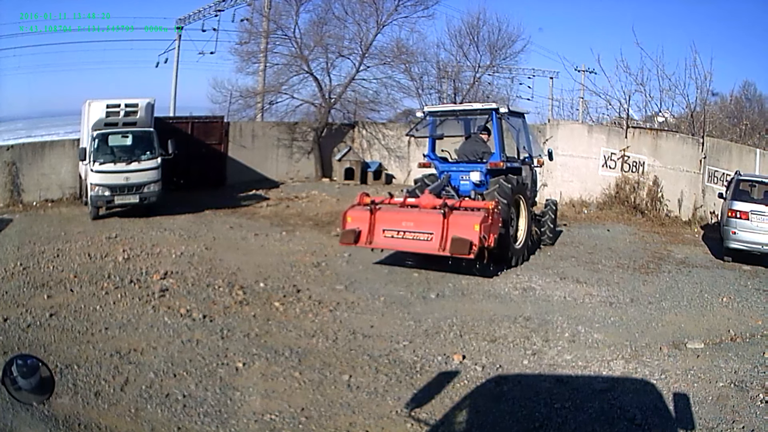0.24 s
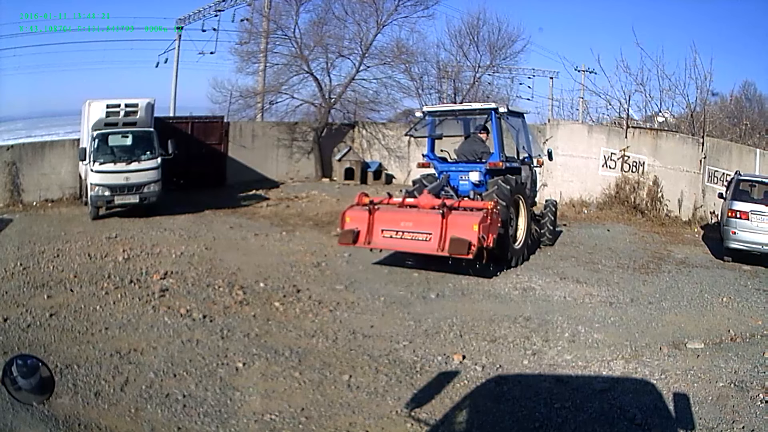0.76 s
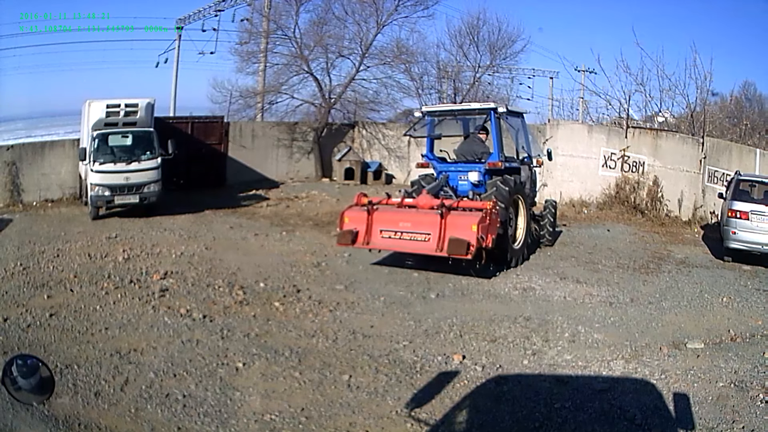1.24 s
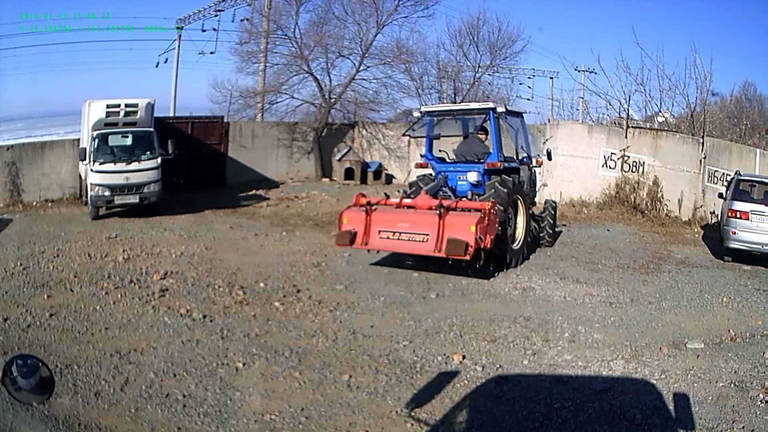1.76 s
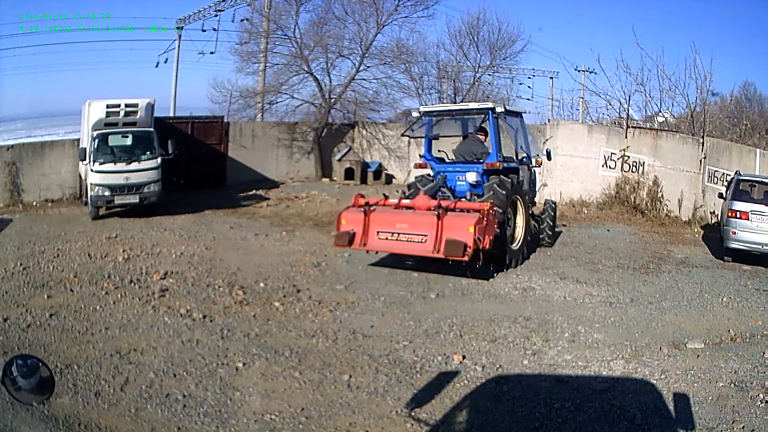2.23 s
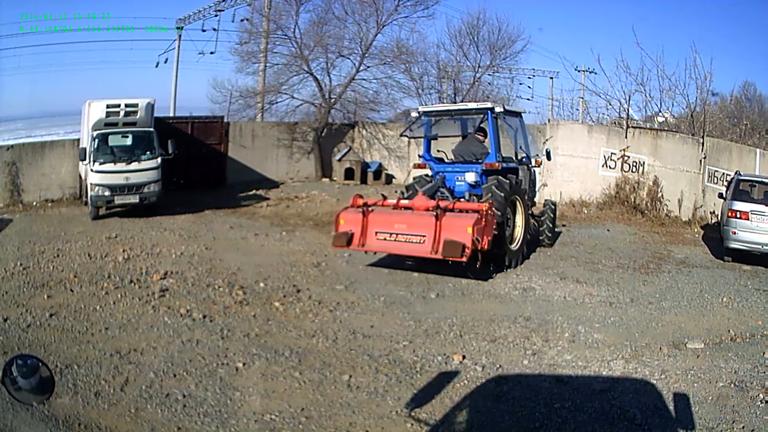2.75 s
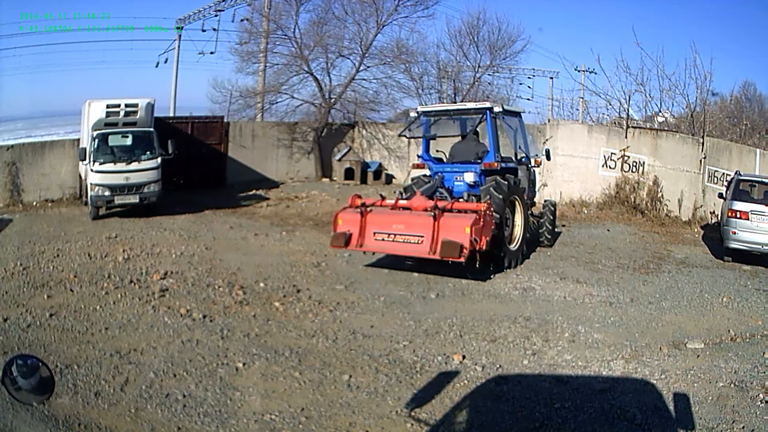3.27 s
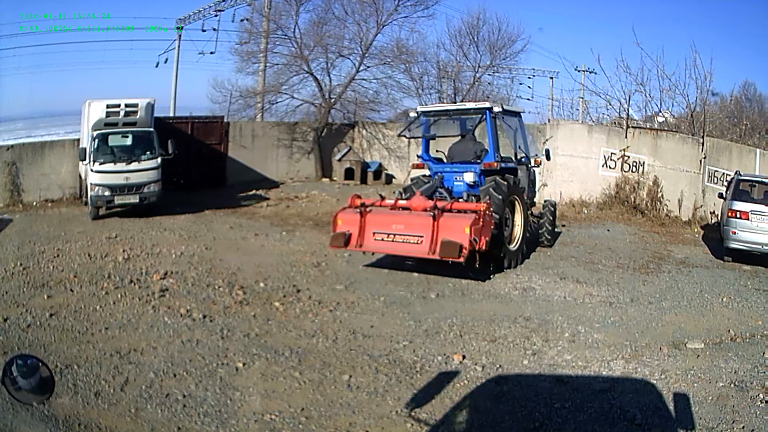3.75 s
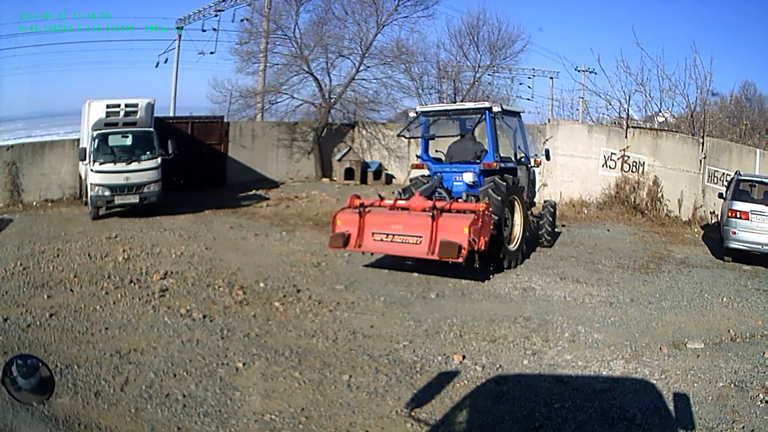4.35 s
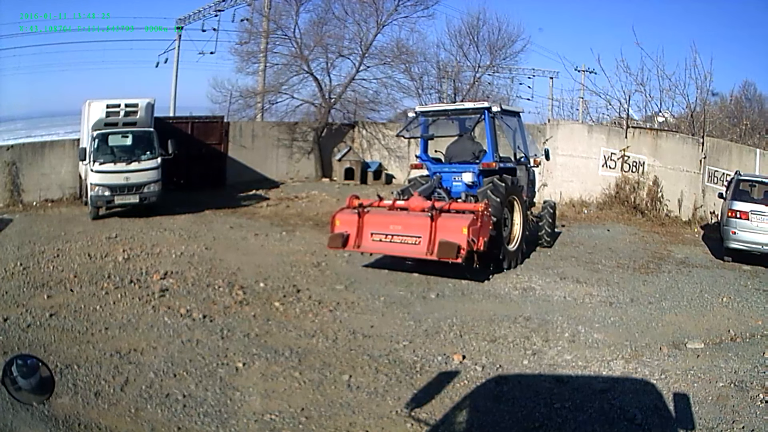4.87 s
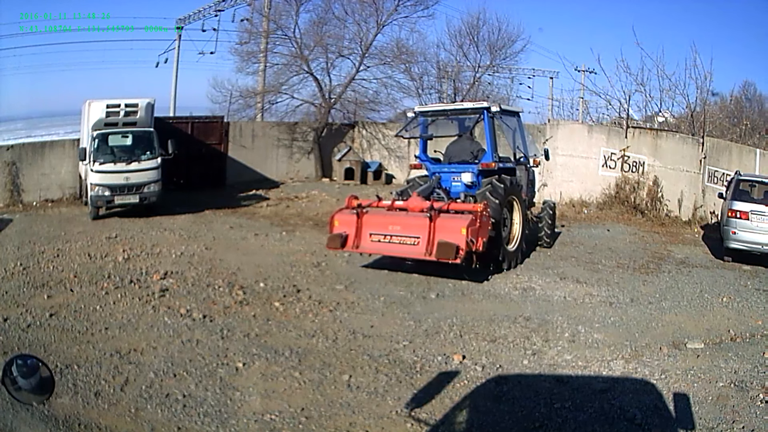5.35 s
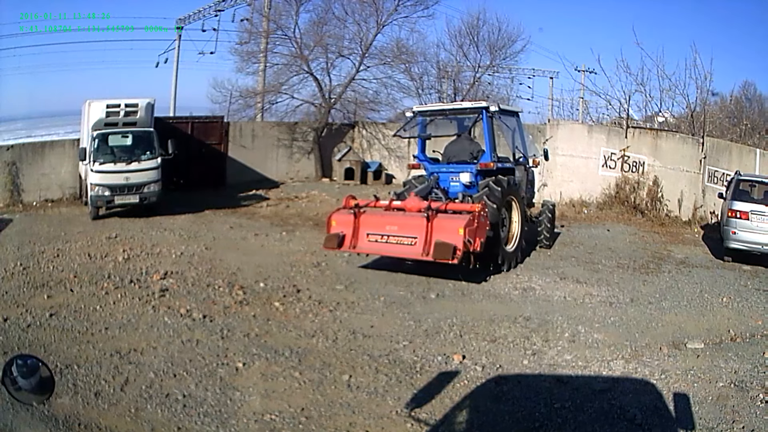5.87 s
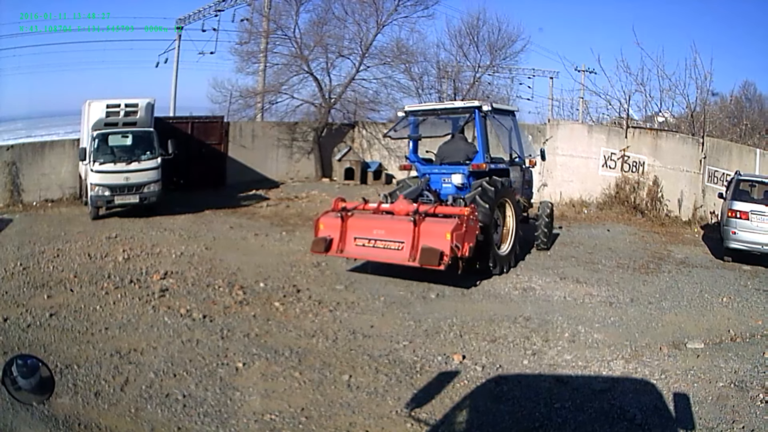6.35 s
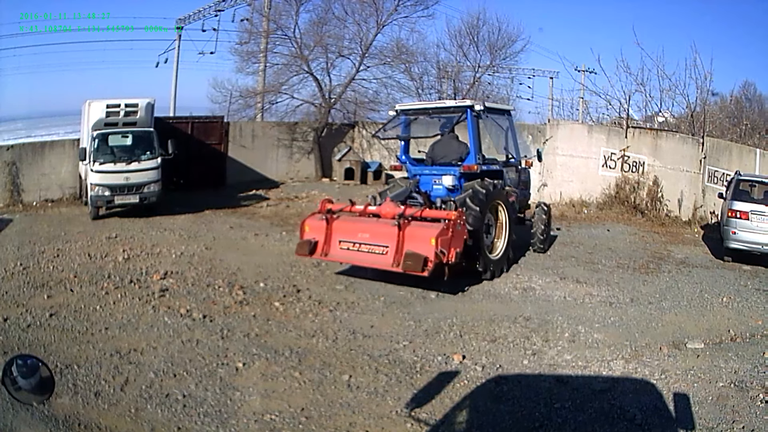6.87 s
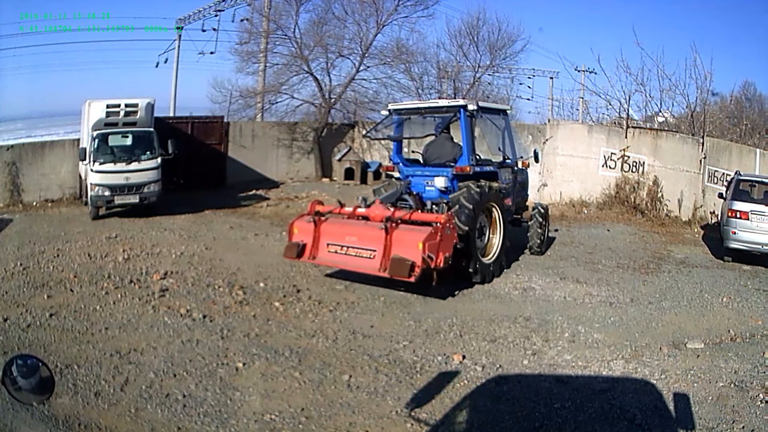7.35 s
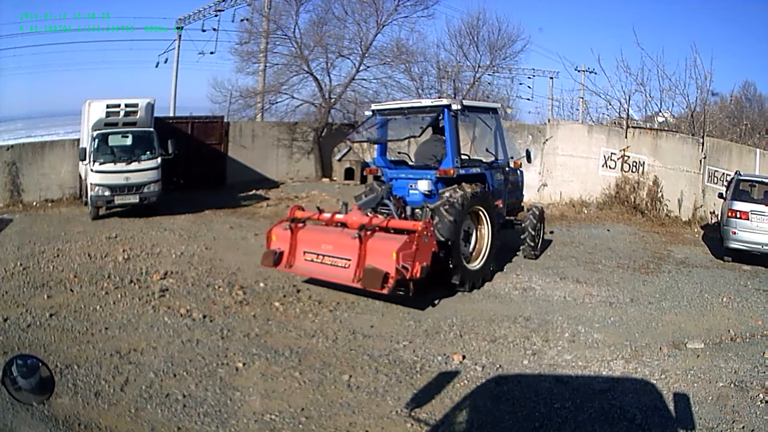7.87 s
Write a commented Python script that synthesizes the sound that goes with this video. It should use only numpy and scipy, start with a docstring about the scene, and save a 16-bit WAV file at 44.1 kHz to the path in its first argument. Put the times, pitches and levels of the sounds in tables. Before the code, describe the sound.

From 0 s a four-cylinder diesel tractor idles about 8 m away in an open yard, around 28 firings a second: low loping chug, hollow body drone, soft clatter and faint humming panels. The small camera's microphone adds bright hiss, fizz flickering 25 times a second and a thin 7 kHz buzz, on until 0.8, then mostly 1.4-2.9, 3.7-5.3 and 5.4-7.4 s. Overall level repeatedly halves in sudden steps. Faint tiller clanks come at 1.2 and 1.6 s. Idle rises slightly near 4 s. At 5.35 s the clutch bites: a hard chuff, firing drops to about 21 a second, clatter hardens, linkage chatters and steel knocks. Level jumps up at 6.0 s. A sharp clank at 6.35 s starts the reverse; revs recover and the engine nears, growing louder. More clanks follow; level falls at 7.4 and 7.8 s, with the strongest bang at 7.85 s.

```python
"""A four-cylinder diesel tractor idles in a yard, 8 m from a small camera and its microphone.
From the start firing pulses drive its exhaust, drone, clatter and panels; the camera adds hiss, flickering fizz
and an on-off buzz, and the overall level jumps in steps. From 1.2 s shaped sines and noise clank the tiller.
At 5.35 s the clutch bites: the engine lugs and chuffs, and noise bursts chatter the linkage.
From 6.4 s the tractor backs toward the microphone and its engine grows louder."""
import sys
import numpy as np
from scipy import signal
from scipy.fft import rfft, irfft, next_fast_len
from scipy.io import wavfile
from scipy.ndimage import uniform_filter1d, map_coordinates

SR = 44100
rng = np.random.default_rng(int(sys.argv[2]) if len(sys.argv) > 2 else 0)


def transcribe(signal):
    """Save signal, clipped to [-1, 1], as a 16-bit WAV file at the path in sys.argv[1]."""
    frames = np.atleast_2d(signal).T
    limited = np.clip(frames, -1, 1)
    pcm = np.round(limited * 32767).astype(np.int16)
    wavfile.write(sys.argv[1], SR, pcm)


N = 357651

# engine speed at idle, dragged down by the clutch, recovering: time_s [s], firing_rate [firings/s]
ENGINE_SPEED = [(0, 27.9), (3.9, 28.25), (4.2, 28.75), (5.33, 28.7), (5.5, 22), (5.9, 21.2), (6.42, 22.4),
                (6.7, 26.2), (7.2, 27.1), (8.11, 27.4)]
# exhaust orders: multiple [of firing rate], idle_level_db [dB], load_level_db [dB]
EXHAUST_ORDERS = [(1, -4.5, -1.5), (2, -2.5, -5), (3, -17, -22), (4, -25, -25), (5, -30, -32),
                  (6, -25, -28)]
# strength of each cylinder in firing order: level_db [dB]
CYLINDER_DB = [0.9, 2.5, 0.5, 1]
# low rumble spectrum: freq_hz [Hz], level_db [dB per Hz]
RUMBLE_SPECTRUM = [(10, -3), (35, 0), (60, -4), (100, -15), (200, -24)]
# body drone spectrum: freq_hz [Hz], level_db [dB per Hz]
DRONE_SPECTRUM = [(70, -34), (110, -11), (150, -3.5), (200, 6.5), (310, -3), (400, 1.5), (480, -8.5),
                  (700, -6)]
# diesel clatter spectrum at idle: freq_hz [Hz], level_db [dB per Hz]
IDLE_SPECTRUM = [(300, -12), (430, -2), (530, 3), (680, -4), (900, -3), (1150, -2.5), (1350, 0),
                 (1580, 2.5), (1720, -3), (1880, -10.5), (2300, -12), (2900, -43), (5000, -9)]
# diesel clatter spectrum under load: freq_hz [Hz], level_db [dB per Hz]
LOAD_SPECTRUM = [(300, -13), (470, -9.5), (720, 2), (930, -2), (1080, 6), (1200, -2.5), (1330, 9.5),
                 (1480, 1), (1600, 7.5), (1840, -9), (1980, -2.5), (2100, -8.5), (2400, -9.5),
                 (2900, -23.5)]
# injector tick spectrum: freq_hz [Hz], level_db [dB per Hz]
INJECTOR_SPECTRUM = [(1500, -9), (2400, 3.5), (3000, 4.5), (3800, 10), (4800, 8.5), (6500, 3.5),
                     (8000, 2.5), (11000, -6)]
# thin panel resonances: pitch_hz [Hz], width_hz [Hz], idle_level_db [dB], load_level_db [dB]
PANEL_MODES = [(253, 10, -3, -14), (278, 16, -3, -2), (310, 24, 3, -4), (517, 12, -2, -12),
               (543, 10, -12, -1), (590, 18, -1, -10), (680, 12, -14, -3), (743, 10, -14, -5),
               (995, 24, -6, -6), (1110, 20, -11, -3), (1335, 14, -10, -2), (1437, 14, -8, -8),
               (1570, 45, -6, -3), (1757, 9, -18, 1), (1980, 16, -24, -9), (2400, 16, -28, -6)]
# engine orders that hum for a while: start_s [s], end_s [s], multiple [of firing rate], level_db [dB]
ORDER_HUMS = [(-.6, 1.1, 9, -51), (-.6, 5.5, 11, -52), (1.4, 3.3, 21, -50), (1.2, 3.1, 35, -50.5),
              (3.9, 5.5, 10, -53), (3.9, 5.5, 14, -54), (3.9, 5.5, 20, -51), (4, 5.5, 50, -49.5),
              (6.8, 8.4, 10, -51)]
# camera hiss spectrum: freq_hz [Hz], level_db [dB per Hz]
HISS_SPECTRUM = [(1800, -15), (2600, -5.5), (3500, -2.5), (5200, -5), (6000, 8.5), (6700, 6.5), (7400, 7),
                 (7950, -9.5), (8600, 11), (9800, -1.5), (10500, -1), (11400, -12.5)]
# camera fizz spectrum: freq_hz [Hz], level_db [dB per Hz]
FIZZ_SPECTRUM = [(7900, -41), (8400, -38), (8600, -6.5), (8850, 1.5), (9050, -4.5), (9350, -18.5),
                 (10000, -19), (11000, -31)]
# spectrum of the noise within the buzz: freq_hz [Hz], level_db [dB per Hz]
BUZZ_NOISE_SPECTRUM = [(2200, -17), (3200, -13), (3520, -0.5), (3900, -9), (5200, -10.5), (5850, 1.5),
                       (6200, -12.5), (6650, 8), (7300, -7.5), (7900, -49), (10100, -24), (10550, -4.5),
                       (11400, -28)]
# ringing of the electrical buzz: pitch_hz [Hz], width_hz [Hz], level_db [dB]
BUZZ_RING_MODES = [(6555, 60, -8), (6780, 55, -3), (7025, 85, 0)]
# when the buzz is on: start_s [s], end_s [s]
BUZZ_TIMES = [(-.1, .79), (1.36, 2.95), (3.68, 5.27), (5.39, 5.76), (5.81, 7.405)]
# ringing of the tiller's steel: pitch_hz [Hz], level_db [dB], t60_s [s]
STEEL_MODES = [(194, -2, 0.22), (242, -16, 0.052), (334, 7.5, 0.65), (395, 11, 0.15), (474, 17.5, 0.16),
               (567, -16, 0.15), (625, 16, 0.097), (742, 5, 0.27), (850, -23, 0.11), (870, -42, 0.023),
               (1069, 14, 0.17), (1056, -14, 0.09), (1232, 18, 0.18), (1390, 17, 0.05), (1630, -9, .06)]
# tiller clanks: start_s [s], level_db [dB], centre_hz [Hz], spread_oct [octaves], contact_noise_s [s]
TILLER_CLANKS = [(1.217, -28.5, 1560, .08, .06), (1.565, -33, 470, .3, .12), (5.445, -22, 1000, .8, .1),
                 (5.585, -26, 750, .8, .12), (5.705, -20, 800, .8, .14), (6.099, -23, 700, 1.4, .05),
                 (6.348, -13.5, 1200, .4, .036), (6.35, -19, 240, .6, .06), (6.384, -27, 400, 1, .07),
                 (6.487, -26.5, 700, .3, .08), (6.817, -17.5, 700, .22, .05), (7.175, -26.5, 600, .7, .08),
                 (7.555, -27, 520, .5, .08), (7.846, -7.7, 720, .42, .034)]
# linkage chatter spectrum: freq_hz [Hz], level_db [dB per Hz]
LINKAGE_SPECTRUM = [(250, -12), (400, -7), (480, 9.5), (580, -3.5), (740, -1.5), (880, -3), (1040, 4.5),
                    (1200, -5), (1600, -16.5), (2500, -22)]
# the overall level drops to half: start_s [s], end_s [s]
LEVEL_DIPS = [(.38, .565), (.945, 1.212), (1.402, 1.77), (2.335, 2.42), (2.8, 2.98), (3.27, 3.63),
              (3.82, 4.185), (4.745, 4.79), (5.215, 5.993), (7.81, 8.2)]
# the overall level doubles: start_s [s], end_s [s]
LEVEL_BOOSTS = [(5.993, 7.445)]

# the clutch hands over a share of the load as it bites (s), the rest during the pull (s)
CLUTCH_S, BITE_S, BITE_SHARE, PULL_S = 5.35, 0.045, 0.55, 1.8
# the tractor starts to roll, its first distance from the microphone, its speed
ROLL_S, DISTANCE_M, ROLL_M_PER_S = 6.4, 8, 1.1
# engine layers before the approach: idle level (dB), rise at full load (dB), rise per firing/s lost (dB)
EXHAUST_DB, EXHAUST_LOAD_DB, EXHAUST_LUG_DB = -35.3, 5.6, 0.3
RUMBLE_DB, RUMBLE_LOAD_DB, RUMBLE_LUG_DB = -47.2, 4, 0.35
DRONE_DB, DRONE_LOAD_DB, DRONE_LUG_DB = -45, -2, 0.8
CLATTER_DB, CLATTER_LOAD_DB = -42, 6
# each chug leaves the pipe this share of a firing period after its knock
EXHAUST_LAG = 0.363
# one hard chuff as the clutch bites: peak rise, time from bite to peak
CHUFF_DB, CHUFF_S = 5, 0.039
# a longer contact starts more softly: attack time over contact length
ATTACK_SHARE = 0.022
LINKAGE_DB, LINKAGE_SETTLE_DB_PER_S = -35.5, 5
# size of a level step, upper limit of the sound, resting value of the converter (full scale = 1)
STEP_DB, TOP_HZ, OFFSET = 6, 11550, -0.028


def amp(db):
    """Decibels to gain."""
    return 10 ** (np.asarray(db) / 20)


def unit(x):
    """Scale to rms 1."""
    return x / np.sqrt(np.mean(x ** 2) + 1e-20)


def clock():
    """The time of each sample in seconds."""
    return np.arange(N) / SR


def wobble(rate):
    """A smooth random curve with rate knots a second."""
    return map_coordinates(rng.standard_normal(int(N * rate / SR) + 4), [clock() * rate])


def ramp(start, length):
    """Rises evenly from 0 to 1, start and length in seconds."""
    return np.clip((clock() - start) / length, 0, 1)


def during(spans, size):
    """1 inside the (start_s, end_s) spans and 0 outside, with edges of size samples."""
    inside = sum(1.0 * ((clock() > start) & (clock() < end)) for start, end in spans)
    return uniform_filter1d(inside, size=size)


def filtered(x, response):
    """x times a response of frequency."""
    m = next_fast_len(N + SR // 2)
    return irfft(rfft(x, m) * response(np.fft.rfftfreq(m, 1 / SR)), m)[..., :N]


def coloured(x, spectrum):
    """x shaped by (freq_hz, level_db) points with closed ends, at rms 1."""
    freq, db = np.transpose(spectrum)

    def response(hz):
        return amp(np.interp(np.log(hz + 1), np.log(freq), db, left=-120, right=-120))

    return unit(filtered(x, response))


def resonant(x, modes):
    """x through (pitch_hz, width_hz, level_db) resonances with steepened skirts, at rms 1."""
    def response(f):
        total = 0
        for centre, width, db in modes:
            peak = 1j * f * width / (centre ** 2 - f ** 2 + 1j * f * width)
            skirt = 1 + ((f - centre) / (6 * width)) ** 2
            total = total + amp(db) * peak / skirt
        return total

    return unit(filtered(x, response))


def bursts(cycles, decay, base):
    """Noise that flares once a cycle and dies to a base level; decay in cycles."""
    return rng.standard_normal(N) * (base + np.exp(-(cycles % 1) / decay))


def knocking(firings, decay, base, repeat, scatter_db):
    """Each cylinder knocks with a ring of its own; repeat is its power share against unrepeated rattle."""
    number = firings.astype(int)
    starts = np.flatnonzero(np.diff(number)) + 1
    cylinder = np.arange(number[-1] + 1) % len(CYLINDER_DB)
    scatter = scatter_db * rng.standard_normal(len(cylinder))
    strength = amp(np.array(CYLINDER_DB)[cylinder] + scatter)
    age = np.arange(SR // 10) * firings[-1] / N  # in firings
    rings = np.zeros(N)
    for c in range(len(CYLINDER_DB)):
        own = starts[cylinder[number[starts]] == c]
        blows = np.bincount(own, strength[number[own]], N)
        ring = rng.standard_normal(len(age)) * np.exp(-age / decay)
        rings += signal.fftconvolve(blows, ring)[:N]
    rattle = strength[number] * bursts(firings, decay, base)
    return np.sqrt(repeat) * unit(rings) + np.sqrt(1 - repeat) * unit(rattle)


def engine_load():
    """Load 0-1: a jump as the clutch bites, then a steady climb."""
    jump = BITE_SHARE * ramp(CLUTCH_S, BITE_S)
    return jump + (1 - BITE_SHARE) * ramp(CLUTCH_S + BITE_S, PULL_S)


def exhaust(firings, load, lug):
    """The lowest orders of the firing rate; uneven cylinders make them lope once an engine cycle."""
    orders = np.zeros(N)
    for k, idle_db, load_db in EXHAUST_ORDERS:
        lag = (k - 1) * (k - 2)  # radians: the pipe delays the higher orders and rounds each chug
        level = idle_db + load * (load_db - idle_db) + 0.5 * wobble(7.9)
        orders += amp(level) * np.cos(2 * np.pi * k * firings - lag)
    lope = 1 + 0.1 * np.cos(2 * np.pi * firings / len(CYLINDER_DB)) + 0.08 * wobble(14)
    chuff = np.exp(-((clock() - CLUTCH_S) / CHUFF_S - 1) ** 2)
    level_db = EXHAUST_DB + EXHAUST_LOAD_DB * load + EXHAUST_LUG_DB * lug + CHUFF_DB * chuff
    return np.sqrt(2) * amp(level_db) * orders * lope


def rumble(load, lug):
    """Steady low noise that grows with load and as the engine slows."""
    level_db = RUMBLE_DB + RUMBLE_LOAD_DB * load + RUMBLE_LUG_DB * lug
    return amp(level_db) * coloured(rng.standard_normal(N), RUMBLE_SPECTRUM)


def drone(firings, load, lug):
    """The body drones as slowly dying knocks overlap."""
    knocks = knocking(firings, decay=1.3, base=1.8, repeat=0.56, scatter_db=0.66)
    level_db = DRONE_DB + DRONE_LOAD_DB * load + DRONE_LUG_DB * lug
    return amp(level_db) * coloured(knocks, DRONE_SPECTRUM)


def clatter(firings, load):
    """Combustion knocks shift to a harder, brighter clatter under load, with injector ticks on top."""
    soft = knocking(firings, decay=1.53, base=1.4, repeat=0.65, scatter_db=0.37)
    hard = knocking(firings, decay=0.75, base=0.95, repeat=0.65, scatter_db=0.4)
    # valves and pistons strike again halfway between the firings
    hard += 0.6 * unit(bursts(2 * firings, decay=1.0, base=0.24))
    idle = np.sqrt(1 - load) * coloured(soft, IDLE_SPECTRUM)
    loaded = np.sqrt(load) * coloured(hard, LOAD_SPECTRUM)
    injection = knocking(firings, decay=0.42, base=0.32, repeat=0.2, scatter_db=1.2)
    ticks = amp(-13.3) * load * coloured(injection, INJECTOR_SPECTRUM)
    return amp(CLATTER_DB + CLATTER_LOAD_DB * load) * (idle + loaded + ticks)


def panels(firings, load):
    """The knocks shake thin panels into resonance, in one balance at idle and another under load."""
    shake = knocking(firings, decay=1.0, base=0.62, repeat=0.75, scatter_db=1.44)
    pitch, width, idle_db, load_db = np.transpose(PANEL_MODES)
    idle = amp(-46.5) * np.sqrt(1 - load) * resonant(shake, np.c_[pitch, width, idle_db])
    loaded = amp(-40.5) * load * resonant(shake, np.c_[pitch, width, load_db])
    return idle + loaded


def hums(firings):
    """Single engine orders swell out of the clatter, waver and sink back."""
    out = np.zeros(N)
    for start, end, multiple, db in ORDER_HUMS:
        swell = np.sqrt(np.abs(np.sin(np.pi * ramp(start, end - start))))
        level = swell * amp(db + 2 * wobble(10))
        out += level * np.cos(2 * np.pi * multiple * firings + 0.3 * wobble(12))
    return np.sqrt(2) * out


def tractor():
    """One slightly unsteady count of firings drives every engine layer except the rumble noise."""
    time_s, rate = np.transpose(ENGINE_SPEED)
    speed = np.interp(clock(), time_s, rate)
    firings = np.cumsum(speed * (1 + 0.001211 * wobble(6))) / SR
    load = engine_load()
    lug = np.maximum(speed[0] - speed, 0)  # firings per second lost
    low = exhaust(firings - EXHAUST_LAG, load, lug) + rumble(load, lug) + drone(firings, load, lug)
    return low + clatter(firings, load) + panels(firings, load) + hums(firings)


def nearness():
    """Gain of the engine, inverse to its distance from the microphone."""
    return DISTANCE_M / (DISTANCE_M - ROLL_M_PER_S * np.maximum(clock() - ROLL_S, 0))


def electronics():
    """Camera hiss, a fizz that flickers at the frame rate, an on-off high buzz and a faint whistle."""
    t = clock()
    frames, buzzes = 25 * t, 211.9 * t  # cycles at 25 and 211.9 Hz
    on = during(BUZZ_TIMES, size=200)
    hiss = amp(-44) * coloured(rng.standard_normal(N), HISS_SPECTRUM)
    sparks = bursts(frames, decay=0.3, base=0.2) * amp(2 * wobble(200))
    # the fizz is weaker while the buzz is on
    fizz = amp(-43.5 - 4.2 * on + 0.57 * wobble(11)) * coloured(sparks, FIZZ_SPECTRUM)
    # the buzz pulses fast and swells once in every four pulses
    swell = 1 + 0.21 * np.cos(2 * np.pi * buzzes / 4)
    pulse = 1 + 0.2 * np.sin(2 * np.pi * buzzes)
    ring = signal.hilbert(resonant(rng.standard_normal(N), BUZZ_RING_MODES))
    steadied = ring.real / (np.abs(ring) + 1)  # evens out the strength
    whine = amp(-43) * unit(steadied * pulse * swell)
    buzz_bursts = swell * bursts(buzzes, decay=0.33, base=0.53)
    buzz_noise = amp(-46) * coloured(buzz_bursts, BUZZ_NOISE_SPECTRUM)
    whistle = amp(-62) * np.sin(2 * np.pi * 5185 * t)
    return hiss + fizz + on * (whine + buzz_noise) + whistle


def tiller():
    """Each clank rings the steel around its own centre frequency, with a short dull crack."""
    out, t = np.zeros(N + SR), np.arange(SR // 3) / SR
    pitch, mode_db, t60 = np.transpose(STEEL_MODES)[:, :, None]
    grid = np.fft.rfftfreq(len(t), 1 / SR) + 1
    for start, db, centre_hz, spread, length in TILLER_CLANKS:
        def reach(f):
            return np.exp(-0.5 * (np.log2(f / centre_hz) / spread) ** 2)

        detuned = pitch * (1 + 0.015 * rng.standard_normal(pitch.shape))
        gains = reach(pitch) * amp(mode_db + 2 * rng.standard_normal(pitch.shape))
        tones = np.sin(2 * np.pi * (detuned * t + rng.random(pitch.shape)))
        ring = np.sum(gains * amp(-60 * t / t60) * tones, axis=0) / np.linalg.norm(gains)
        dull = reach(grid) / (1 + (grid / 1500) ** 6)
        crack = unit(irfft(rfft(rng.standard_normal(len(t))) * dull, len(t)))
        contact = crack * amp(-60 * t / length)
        attack = 1 - np.exp(-t / (ATTACK_SHARE * length))
        out[round(start * SR):][:len(t)] += amp(db) * (0.47 * ring + 0.64 * contact) * attack
    return out[:N]


def linkage():
    """Pins and chains chatter in quick, uneven bursts from the moment the clutch bites, and slowly settle."""
    contacts = np.cumsum(30 * amp(4.4 * wobble(25))) / SR  # around 30 a second
    settling = amp(LINKAGE_DB - LINKAGE_SETTLE_DB_PER_S * (clock() - CLUTCH_S))
    chatter = bursts(contacts, decay=0.4, base=0.3) * amp(1.5 * wobble(20))
    return ramp(CLUTCH_S, BITE_S) * settling * coloured(chatter, LINKAGE_SPECTRUM)


def scene():
    """The approaching engine, the tiller and the linkage, in mono."""
    return (nearness() * tractor() + tiller() + linkage())[None]


def record(dry):
    """The camera adds its noises, the level jumps in steps, the top is cut, the converter rests off zero."""
    level_db = STEP_DB * (during(LEVEL_BOOSTS, size=60) - during(LEVEL_DIPS, size=60))
    stepped = (dry + electronics()) * amp(level_db)
    return OFFSET + filtered(stepped, lambda hz: hz < TOP_HZ)


dry = scene()
out = record(dry)
transcribe(out)
```